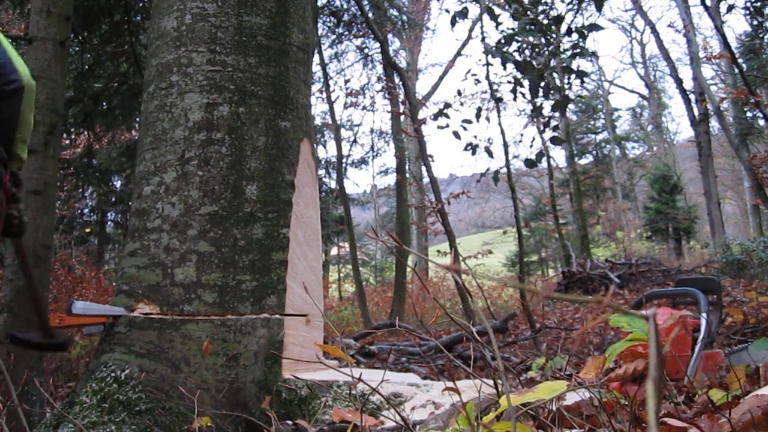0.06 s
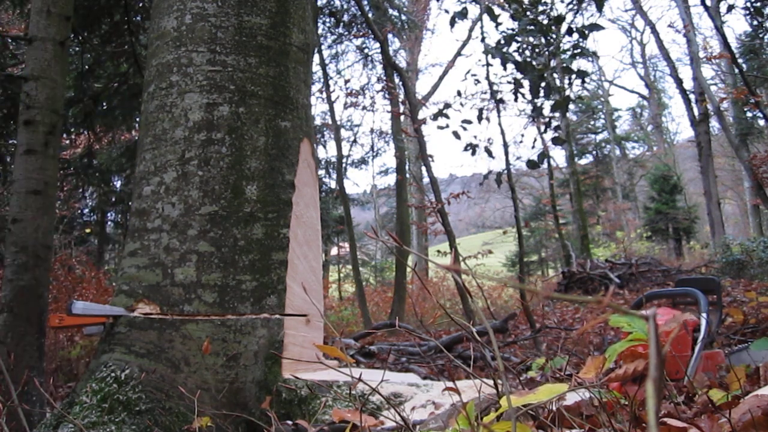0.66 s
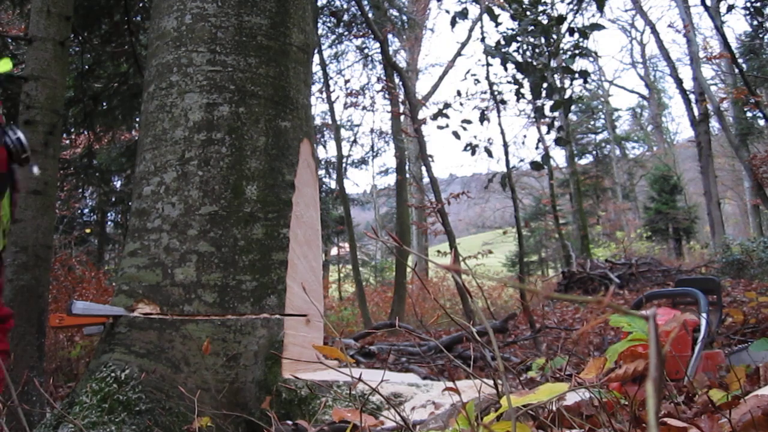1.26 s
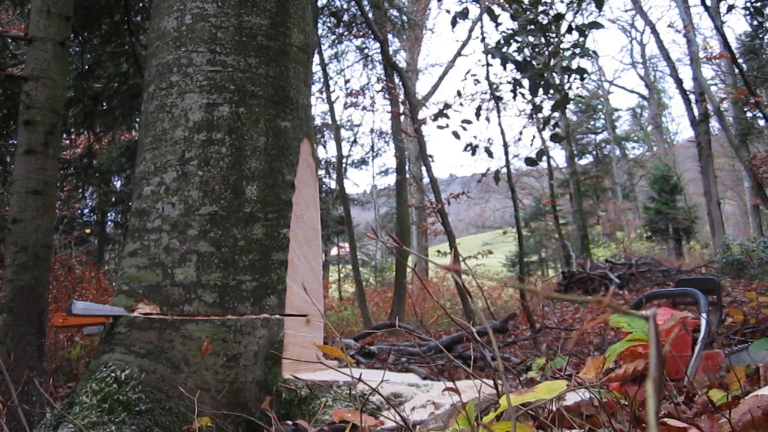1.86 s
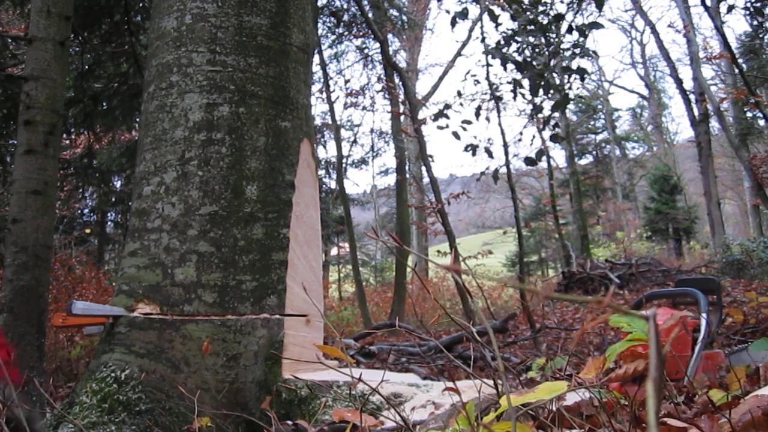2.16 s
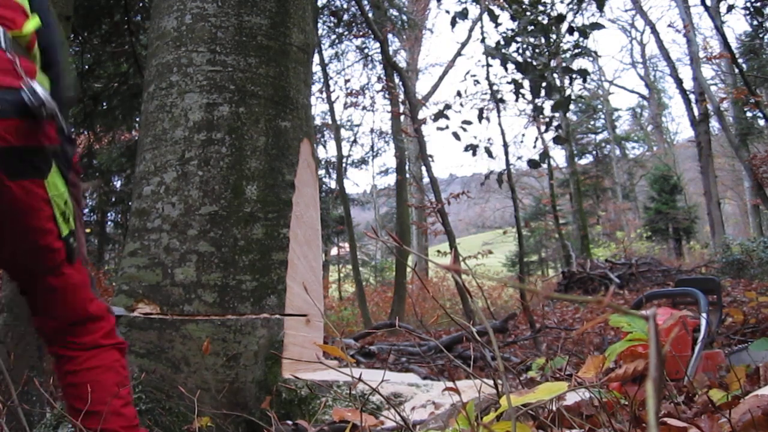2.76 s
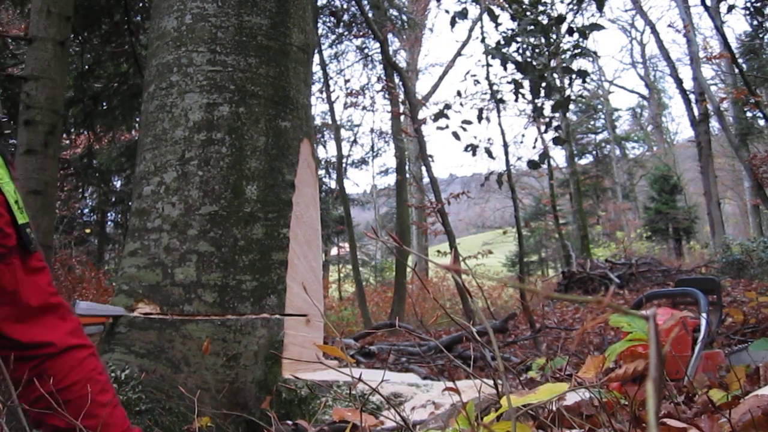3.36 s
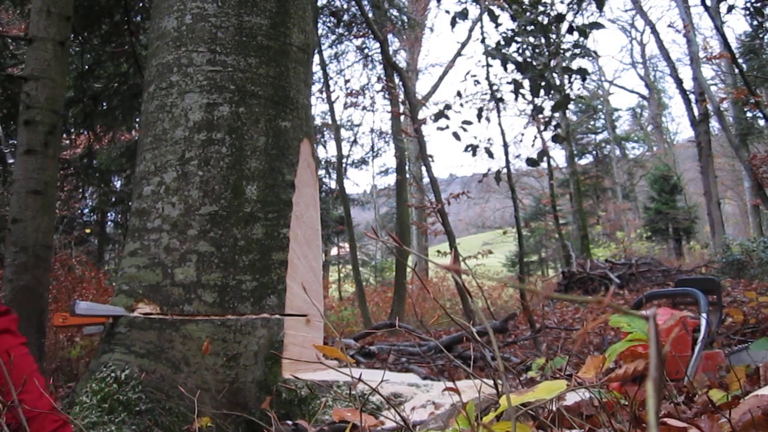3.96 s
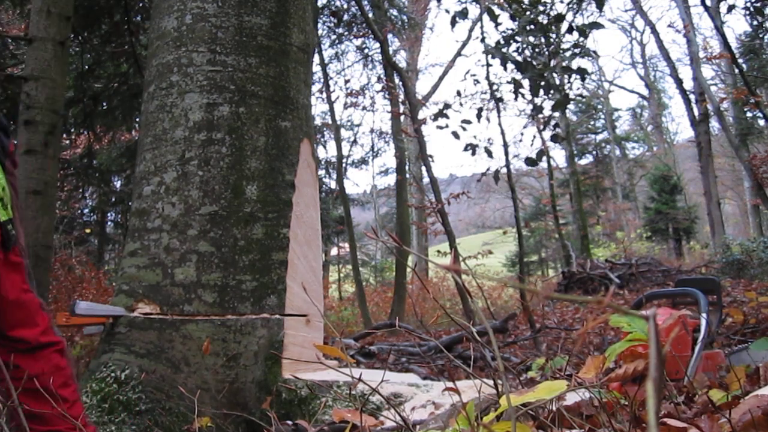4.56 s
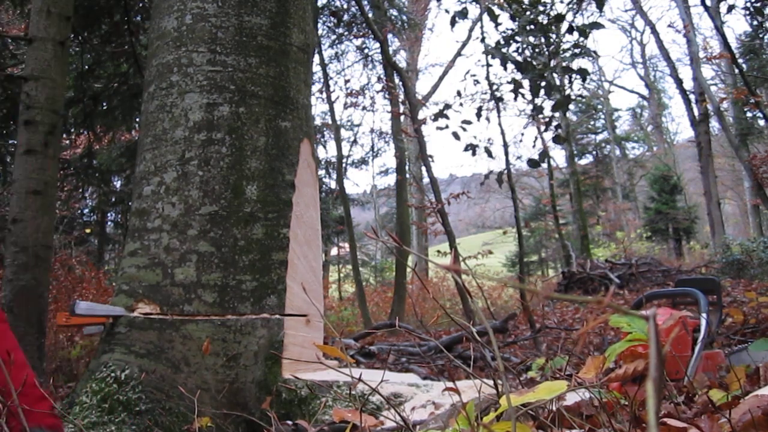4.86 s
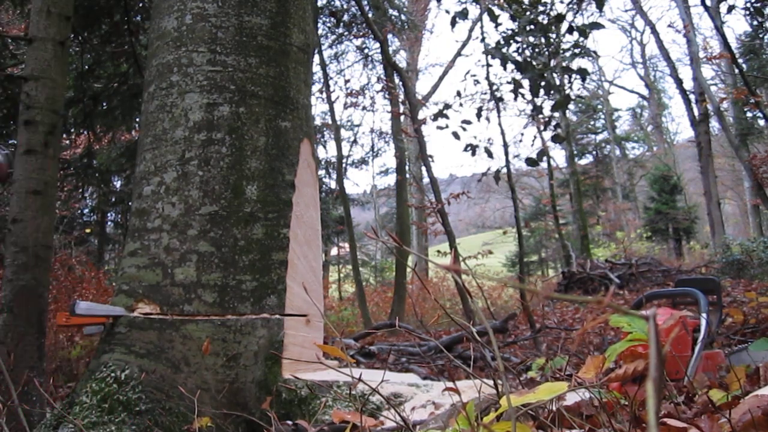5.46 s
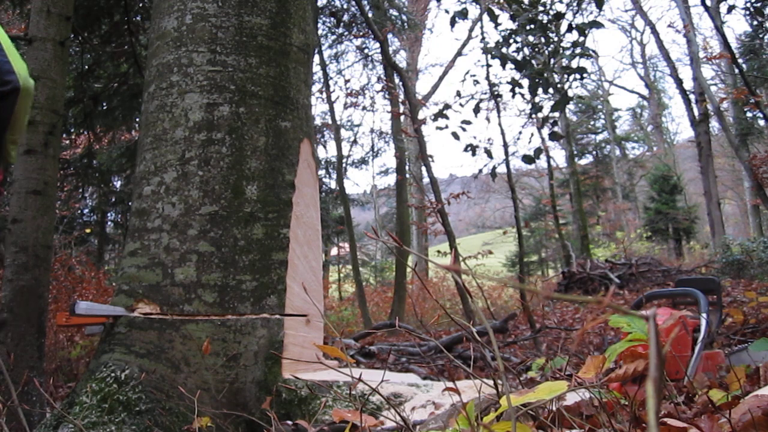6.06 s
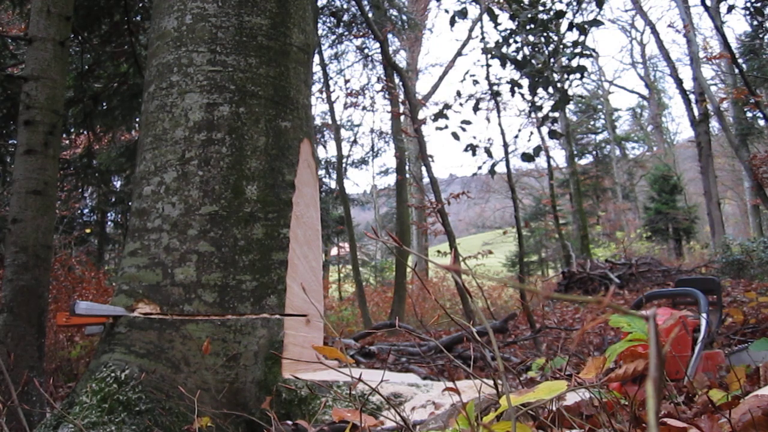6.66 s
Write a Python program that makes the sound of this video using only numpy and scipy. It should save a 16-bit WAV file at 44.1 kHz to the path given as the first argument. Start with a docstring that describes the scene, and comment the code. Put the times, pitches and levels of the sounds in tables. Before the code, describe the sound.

An axe strikes a felling wedge five times, sharp woody knocks with a forest echo, amid small twig cracks and rustling clothes.

```python
"""An axe head drives a felling wedge into the saw cut of a standing tree: five hard blows.
Each jerks the wedge deeper, knocks the wood, booms in the trunk and echoes through the forest;
on some the steel rings. In between, twigs snap, clothes swish, boots scuff and belt gear clinks
over the far rush of the valley. Each blow overloads the close microphone: its gain ducks, then
recovers and lets the echo swell back."""
import sys
import numpy as np
from scipy import signal
from scipy.fft import rfft, irfft, next_fast_len
from scipy.io import wavfile
from scipy.ndimage import uniform_filter1d, minimum_filter1d, map_coordinates

SR = 44100
rng = np.random.default_rng(int(sys.argv[2]) if len(sys.argv) > 2 else 0)


def unload_wav(signal):
    """Save mono or channel-first audio to the path in sys.argv[1] as 16-bit WAV at rate SR, clipped to [-1, 1]."""
    wavfile.write(
        sys.argv[1],
        SR,
        np.round(np.clip(np.atleast_2d(signal).T, -1, 1) * 32767).astype(np.int16),
    )


N = 295911

# The tone of a dry twig. Each row: frequency in Hz, level in dB.
TWIG_SPECTRUM = [(200, -50), (900, -6.5), (2000, -2.5), (3600, -4.5), (5000, -12.5), (7300, -5.5),
                 (11000, -17.5), (15500, -27)]


def axe_blows():
    """The wedge jerks into the cut; where the axe lands sets the colour of knock and echo."""
    # Each row: start in seconds, force in dB, then frequency in Hz and gain in dB for each of knock,
    # clack, ping and dead spot, then hollow in dB, treble in dB, steel ring from 0 to 1, trunk in dB.
    strikes = [(0.0313, 2, 1360, 1.5, 3040, 8, 6380, 7, 906, -5.5, 8, 10.5, 0, 0.5),
               (1.4776, -4.5, 1180, 8.5, 3800, 3, 6600, 5.5, 1690, 0, 3.5, 10, 0.04, 2.5),
               (2.9080, -1, 1150, 2, 2260, 1, 5300, 2, 1494, -11, -1, 9.5, 0.88, 2.5),
               (4.391, -2.5, 1235, 6.5, 4050, 4.5, 6950, 9, 4600, -6.5, -3.5, 5.5, 0, 2),
               (5.921, 0.5, 904, 3.5, 2670, 3, 4550, 10, 1160, -2, 3.5, -1, 0.42, 4)]
    # The tone of the wedge in the wood. Each row: frequency in Hz, level in dB.
    wedge_spectrum = [(100, -10), (200, -14.5), (320, -12), (500, -8), (800, -5.5), (1150, -3), (1600, -5),
                      (2400, -5), (3200, -7), (4800, -16), (7200, -20.5), (11000, -28.5), (14000, -36),
                      (17000, -62)]
    # Axe head and wedge ring together. Each row: frequency in Hz, width in Hz, boost at full ring in dB.
    steel_modes = [(830, 70, 4), (1700, 130, 8), (2148, 130, 8), (2890, 150, 6), (3480, 130, 4),
                   (3990, 170, 7), (4242, 45, 9), (5190, 90, 8), (5650, 140, 5), (6121, 45, 12),
                   (7014, 160, 5), (8021, 130, 14), (10860, 220, 19), (11400, 120, 6), (14930, 260, 16)]
    # The boom of the whole trunk. Each row: frequency in Hz, level in dB.
    trunk_spectrum = [(25, -37), (60, -2), (90, -9), (120, 6.5), (150, 3.5), (200, -4.5), (280, -14),
                      (600, -32)]
    slip_gain_db, knock_gain_db, echo_gain_db, boom_gain_db = 28, 2, 27.5, -25.5
    hollow_hz, knock_rise_s, boom_rise_s = 499, 0.0027, 0.034
    out, t = np.zeros(N), np.arange(SR) / SR
    # the wedge slips in for about 5 ms, then chatters briefly
    slip = bell(t - 0.0036, 0.0014) * (1 - np.exp(-t / 0.003))
    chatter = 0.062 * np.exp(-t / 0.036)
    knock_envelope = (t / knock_rise_s) ** 2 * np.exp(2 - 2 * t / knock_rise_s)
    boom_envelope = t / boom_rise_s * np.exp(1 - t / boom_rise_s)
    for (start, force_db, knock_hz, knock_db, clack_hz, clack_db, ping_hz, ping_db,
         dead_hz, dead_db, hollow_db, treble_db, ring, trunk_db) in strikes:
        ripple_knots = rng.standard_normal(400)

        def body_db(f):
            """The resonances of wood and steel that this blow excites."""
            wood = knock_db * hump(f, knock_hz, 0.2) + clack_db * hump(f, clack_hz, 0.18)
            hollow = hollow_db * hump(f, hollow_hz, 0.15)
            edge = ping_db * hump(f, ping_hz, 0.03) + treble_db * hump(f, 14000, 1.0)
            steel = ring * sum(db / (1 + (2 * (f - hz) / width) ** 2) for hz, width, db in steel_modes)
            # a mode with its node under the axe drops out
            node = dead_db * hump(f, dead_hz, 0.089)
            # many weaker modes ripple the treble, differently on each blow
            ripple = 1.8 * hump(f, 8000, 1) * map_coordinates(ripple_knots, [f / 70], mode="nearest")
            return along(wedge_spectrum, f) + wood + hollow + edge + steel + node + ripple

        body = response(body_db)
        friction = (slip + chatter) * rng.standard_normal(len(t))
        add(out, start, amp(force_db + slip_gain_db) * signal.fftconvolve(friction, body))
        # the wood around the cut knocks for a few cycles
        knock = amp(knock_db) * np.sin(2 * np.pi * knock_hz * t)
        knock += amp(hollow_db - 6) * np.sin(2 * np.pi * hollow_hz * t)
        add(out, start, amp(force_db + knock_gain_db) * knock * knock_envelope)
        echo = forest_echo(build_s=0.0087, grain_db=1.06)
        add(out, start, amp(force_db + echo_gain_db) * signal.fftconvolve(echo, body))
        boom = boom_envelope * noise(lambda f: along(trunk_spectrum, f), len(t))
        add(out, start, amp(trunk_db + boom_gain_db) * boom)
    return out


def forest_echo(build_s, grain_db):
    """Echo of energy 1: scatter from countless trunks builds up, then dies fastest in the treble."""
    # The forest's decay. Each row: frequency in Hz, time to fade by 60 dB in seconds.
    decay_times = [(150, 0.78), (500, 1.31), (1200, 1.76), (3000, 1.32), (5000, 0.99), (8000, 0.77),
                   (14000, 0.35)]
    hz, t, scatter = signal.stft(rng.standard_normal(2 * SR), SR, nperseg=256)
    trunks_db = grain_db * unit(uniform_filter1d(rng.standard_normal(len(t)), size=4))
    fade = amp(trunks_db - 60 * t / along(decay_times, hz)[:, None])
    build = 1 - np.exp(-t / build_s)
    tail = signal.istft(scatter * fade * build, SR, nperseg=256)[1]
    return tail / np.linalg.norm(tail)


def twig_snaps():
    """Dry wood breaks with a sharp tick and a splintering tail; thin twigs are bright, with little body."""
    # Twigs and bark. Each row: start in seconds, level in dB, pitch in Hz, brightness in dB.
    breaks = [(0.463, -21, 3400, -7.5), (1.0036, -27.5, 3750, -8), (1.277, -32.5, 3460, -15),
              (1.3907, -21, 3720, 13), (1.4005, -13, 10800, 9), (1.405, -20, 9600, 8),
              (1.695, -24.5, 3800, 6), (1.9592, -14.5, 3600, -6), (2.187, -30.5, 7040, 17),
              (2.718, -24.5, 3680, 10), (2.7421, -16, 4100, -2), (3.1045, -8, 3660, -8),
              (3.321, -19, 3720, -4), (3.3284, -19, 3670, -7), (3.3642, -19.5, 3820, 1),
              (3.4487, -24, 9600, 4), (3.463, -21.5, 7260, 0), (4.128, -31, 7800, -13),
              (4.2117, -22.5, 3900, -3.5), (4.6455, -25, 3740, 3.5), (5.4054, -19, 7800, 0.5),
              (6.0756, -14, 3660, 8.5), (6.3384, -11, 3900, -2.5), (6.3542, -11.5, 7200, -5),
              (6.3993, -20, 3730, 2.5), (6.415, -18.5, 7960, 7), (6.565, -16.5, 5760, 1)]
    rise_s, crack_t60_s, splinter_t60_s = 0.00072, 0.0086, 0.067
    thinning = 0.77  # dB of woody body lost per dB of brightness
    out, t = np.zeros(N), np.arange(SR // 10) / SR
    envelope = (1 - np.exp(-t / rise_s)) * amp(-60 * t / crack_t60_s)
    for start, db, hz, bright_db in breaks:
        tilt = lambda f: bright_db * (hump(f, 12200, 0.4) - thinning * hump(f, 1400, 0.9))
        twig = response(lambda f: along(TWIG_SPECTRUM, f) + 7 * hump(f, hz, 0.17) + tilt(f))
        crack = envelope / envelope.max() * rng.standard_normal(len(t))
        splinters = amp(-11 - 60 * t / splinter_t60_s) * unit(rng.standard_normal(len(t)) ** 3)
        add(out, start, amp(db - 4) * signal.fftconvolve(crack + splinters, twig / np.linalg.norm(twig)))
    echo = forest_echo(build_s=0.013, grain_db=5)
    return out + amp(-14.5) * signal.fftconvolve(out, echo)[:N]


def clothes_swishes():
    """Stiff work clothes rub as the worker lifts the axe and shifts: each stroke speeds up, then slows."""
    # Cloth on cloth. Each row: fastest moment in seconds, level in dB, length in seconds.
    strokes = [(0.765, -44.5, 0.093), (0.977, -43.5, 0.17), (1.14, -46, 0.02), (1.986, -40.5, 0.032),
               (2.08, -46.5, 0.25), (2.552, -40.5, 0.013), (2.589, -37.5, 0.056), (3.779, -39.5, 0.13),
               (3.942, -49.5, 0.044), (5.003, -42.5, 0.2), (5.285, -44, 0.15), (6.532, -45, 0.053),
               (6.669, -40.5, 0.21)]
    # The tone of the fabric. Each row: frequency in Hz, level in dB.
    cloth_spectrum = [(200, -5.5), (1000, 0), (2000, -1), (3000, 7), (4800, -1), (7800, 3), (12000, -1.5),
                      (15500, -12)]
    rise = 0.51  # share of a stroke spent speeding up
    motion, t = np.zeros(N), np.arange(N) / SR
    for peak_s, db, length_s in strokes:
        width_s = length_s * np.where(t < peak_s, rise, 1 - rise)
        motion += amp(db) * bell(t - peak_s, width_s)
    grain = amp(1.2 * wobble(130) + 2.0 * wobble(1200))
    return motion * grain * noise(lambda f: along(cloth_spectrum, f), N)


def belt_clinks():
    """Loose metal gear on the belt rings in single short notes."""
    # Each row: start in seconds, level in dB, pitch in Hz, time to fade by 60 dB in seconds.
    notes = [(5.508, -41, 3550, 0.075), (5.722, -34, 3640, 0.032), (6.349, -25, 5620, 0.037)]
    out, t = np.zeros(N), np.arange(SR // 5) / SR
    for start, db, hz, t60 in notes:
        add(out, start, amp(db - 60 * t / t60) * np.sin(2 * np.pi * hz * t))
    return out


def rush_and_scuffs():
    """A brief, soft rush of noise just before the first blow; the other rows are boot scuffs."""
    # Each row: loudest moment in seconds, level in dB, centre frequency in Hz, half-width in seconds.
    swells = [(0.01, -37, 2000, 0.025), (2.79, -31.5, 1900, 0.0061), (2.862, -35.5, 1920, 0.0066),
              (4.252, -44, 3260, 0.021), (5.831, -50.5, 2490, 0.044)]
    out, t = np.zeros(N), np.arange(SR // 2) / SR - 1 / 4
    for peak_s, db, hz, width_s in swells:
        band = noise(lambda f: 30 * hump(f, hz, 1.0), len(t))
        add(out, peak_s + t[0], amp(db) * band * bell(t, width_s))
    return out


def footfall(start_s, db, start_hz, fall_s):
    """A boot sinks into the soft ground with a dull thud that falls in pitch."""
    out, t = np.zeros(N), np.arange(SR // 10) / SR
    phase = 2 * np.pi * np.cumsum(start_hz * np.exp(-t / fall_s)) / SR
    add(out, start_s, amp(db) * np.sin(phase) * bell(t - 0.01, 0.011))
    return out


def leaf_ticks(per_second, db):
    """Dead leaves and the smallest twigs tick faintly underfoot at random moments."""
    ticks = (rng.random(N) < per_second / SR) * amp(db + 3.6 * rng.standard_normal(N))
    t = np.arange(SR // 50) / SR
    envelope = signal.fftconvolve(ticks, amp(-60 * t / 0.043))[:N]
    return envelope * noise(lambda f: along(TWIG_SPECTRUM, f), N)


def valley_rush(db):
    """The far rush of the valley lies under everything, barely wavering."""
    # The tone of the rush. Each row: frequency in Hz, level in dB.
    rush_spectrum = [(20, -3), (80, -3), (300, -6), (600, -3), (1150, 1), (2000, -5.5), (3100, -5.5),
                     (4500, -13), (7500, -14), (12000, -17), (16000, -27)]
    return amp(db + 0.78 * wobble(1.8)) * noise(lambda f: along(rush_spectrum, f), N)


def amp(db):
    """Decibels to amplitude."""
    return 10 ** (np.asarray(db) / 20)


def unit(x):
    """Scale to rms 1."""
    return x / np.sqrt(np.mean(x ** 2) + 1e-20)


def along(points, hz):
    """Read a curve of (Hz, value) points on a log-frequency axis."""
    f, v = np.transpose(points)
    return np.interp(np.log(hz + 1), np.log(f), v)


def bell(x, width):
    """A Gaussian of height 1 around zero."""
    return np.exp(-.5 * (x / width) ** 2)


def hump(hz, centre_hz, octaves):
    """A bell on the log-frequency axis."""
    return bell(np.log2((hz + 1) / centre_hz), octaves)


def add(track, start_s, sound):
    """Mix a sound into the track."""
    part = track[max(round(start_s * SR), 0):][:len(sound)]
    part += sound[:len(part)]


def noise(colour_db, size):
    """Noise of rms 1 with a spectrum in dB."""
    gain = amp(colour_db(np.fft.rfftfreq(size, 1 / SR)))
    return unit(irfft(rfft(rng.standard_normal(size)) * gain, size))


def wobble(rate):
    """A smooth random curve, rate knots a second."""
    return map_coordinates(rng.standard_normal(int(N * rate / SR) + 4), [np.arange(N) * rate / SR])


def response(colour_db, size=4096):
    """Causal impulse response of a body with this spectrum in dB."""
    cepstrum = irfft(np.log(amp(colour_db(np.fft.rfftfreq(size, 1 / SR)))))
    cepstrum[1:size // 2] *= 2
    cepstrum[size // 2 + 1:] = 0
    return irfft(np.exp(rfft(cepstrum)))


def scene():
    """The blows and the worker's small sounds over the quiet forest, in mono."""
    nearby = twig_snaps() + belt_clinks() + rush_and_scuffs() + clothes_swishes()
    nearby += footfall(start_s=3.815, db=-38, start_hz=410, fall_s=0.014)
    nearby += leaf_ticks(per_second=6, db=-39.5)
    return (axe_blows() + nearby + valley_rush(db=-46.5))[None]


def gain_control(x, limit_db, depth_db, attack_s, hold_s, release_db_per_s):
    """Gain ducks on overload, waits, then climbs back at a steady rate."""
    excess_db = np.clip(20 * np.log10(np.abs(x) + 1e-9) - limit_db, 0, depth_db)
    half = int(hold_s * SR / 2)
    held_db = -minimum_filter1d(-excess_db, 2 * half + 1, origin=half, mode="constant")
    ramp = release_db_per_s * np.arange(N) / SR
    cut_db = np.maximum.accumulate(held_db + ramp, axis=-1) - ramp
    pole = np.exp(-1 / (attack_s * SR))
    return x * amp(-signal.lfilter([1 - pole], [1, -pole], cut_db))


def record(dry):
    """Each attack outruns the gain control and is squared off; deep bass and top treble are cut."""
    ceiling, low_cut_hz, top_hz = 0.7, 42, 16000
    x = gain_control(dry, limit_db=-4, depth_db=18, attack_s=0.0007, hold_s=0.052, release_db_per_s=178)
    x = np.clip(x, -ceiling, ceiling)
    x = signal.lfilter(*signal.butter(1, low_cut_hz, "highpass", fs=SR), x)
    size = next_fast_len(N + SR // 2)
    low_pass = np.clip((top_hz - np.fft.rfftfreq(size, 1 / SR)) / 600 + .5, 0, 1)
    return irfft(rfft(x, size) * low_pass, size)[..., :N]


dry = scene()
out = record(dry)
unload_wav(out)
```